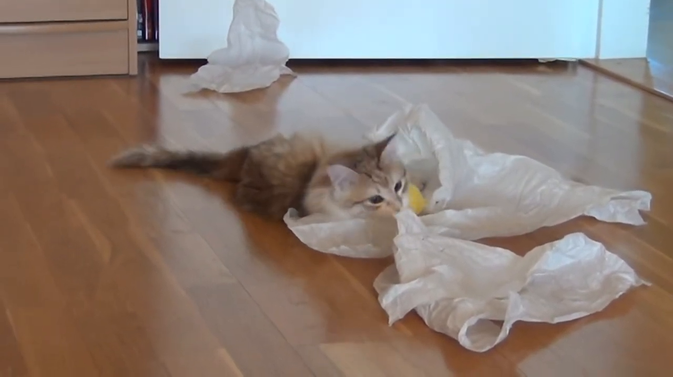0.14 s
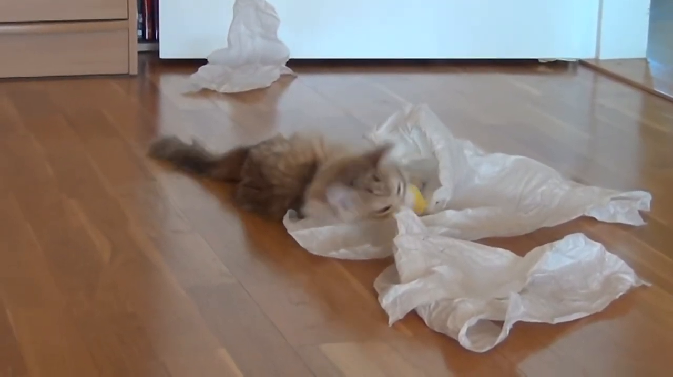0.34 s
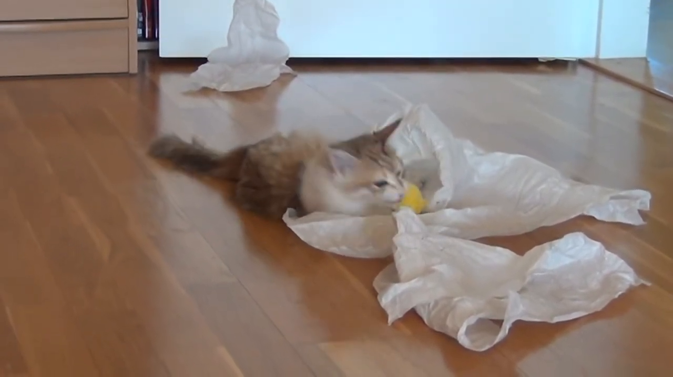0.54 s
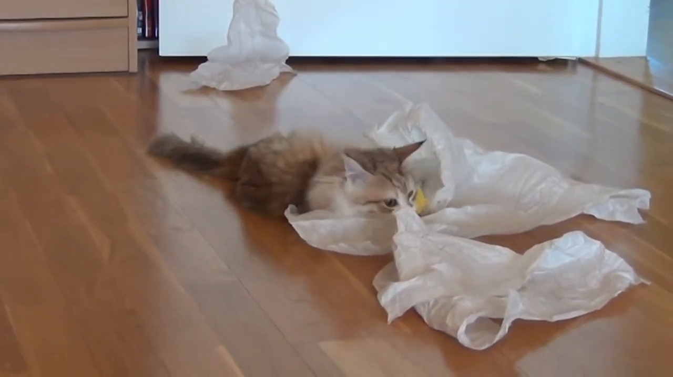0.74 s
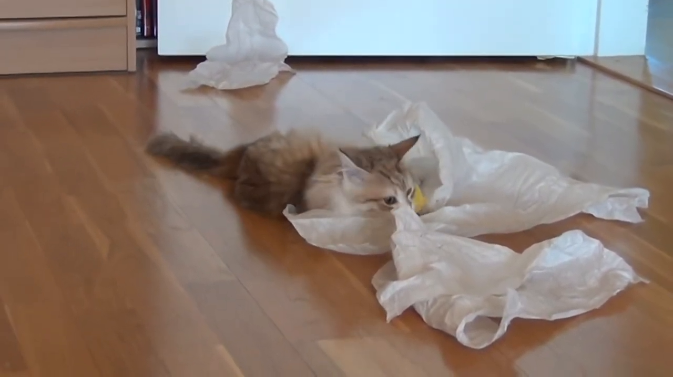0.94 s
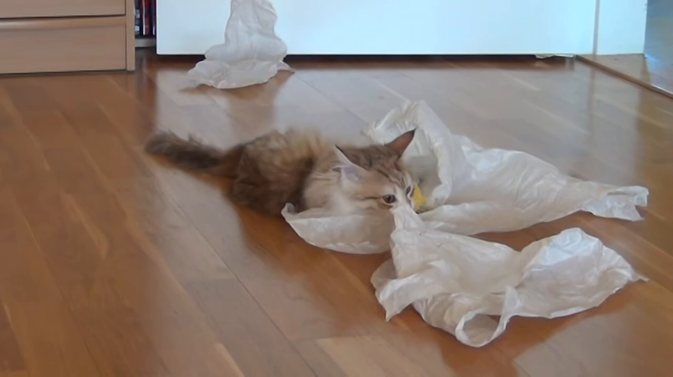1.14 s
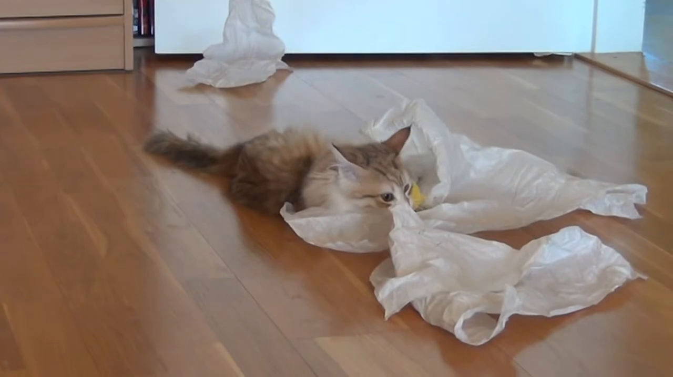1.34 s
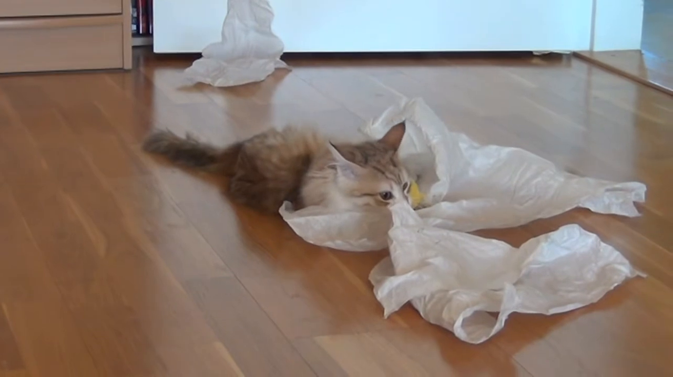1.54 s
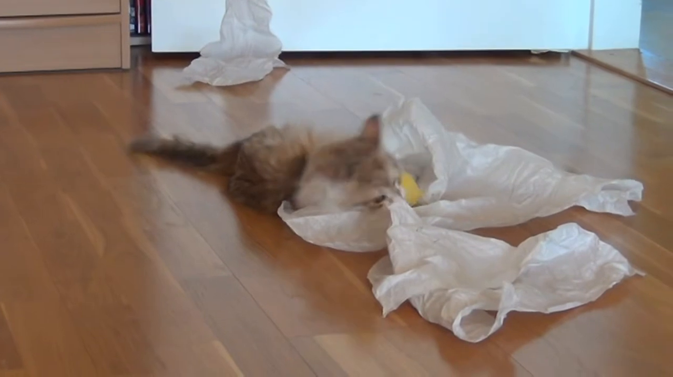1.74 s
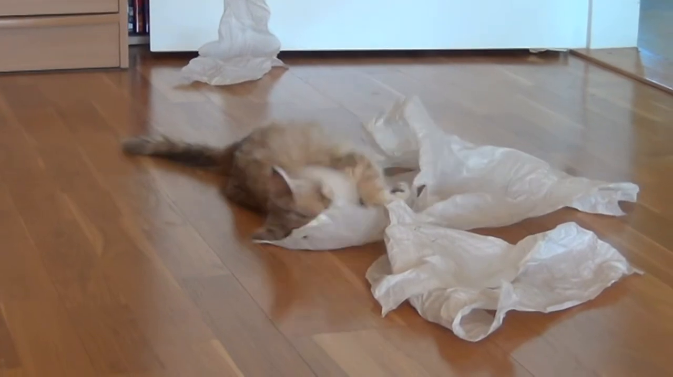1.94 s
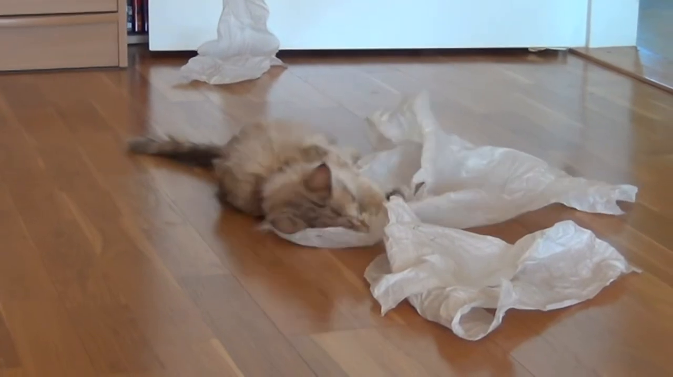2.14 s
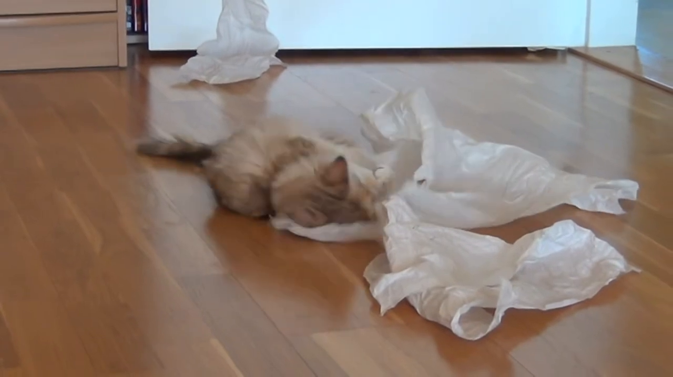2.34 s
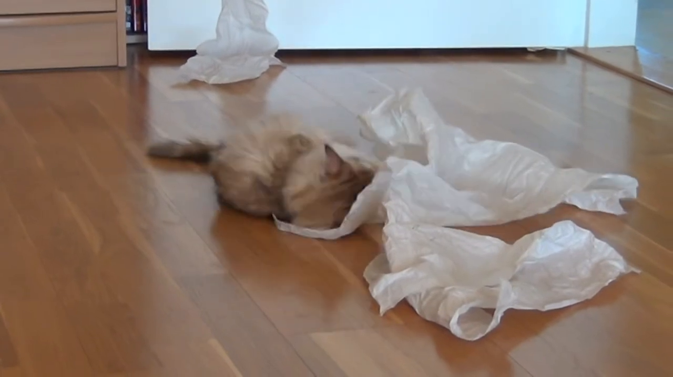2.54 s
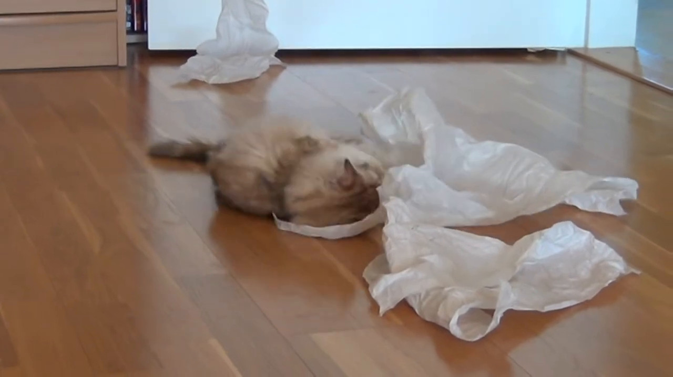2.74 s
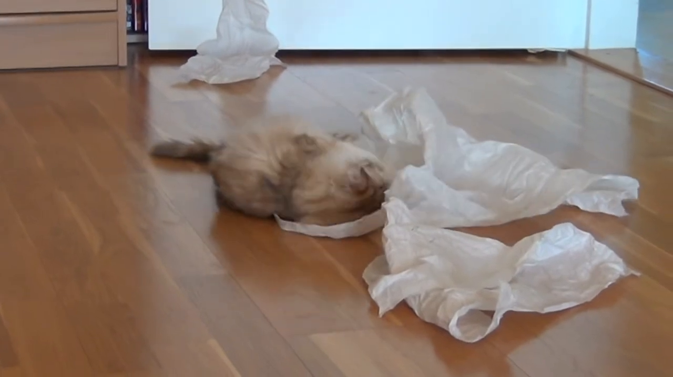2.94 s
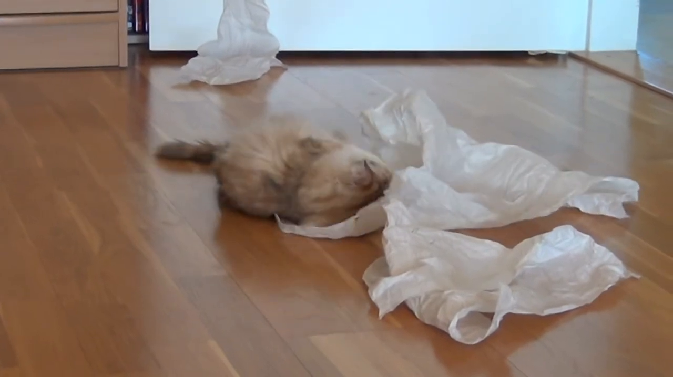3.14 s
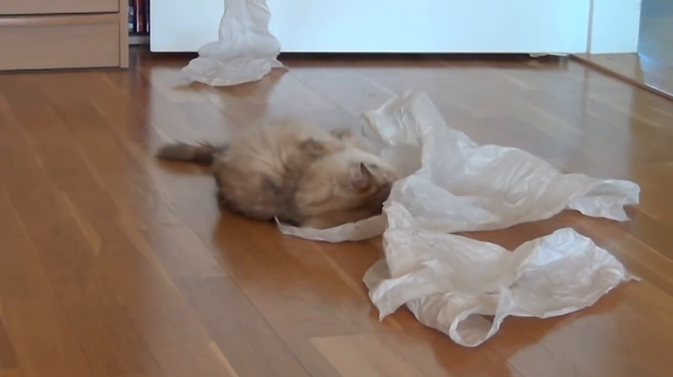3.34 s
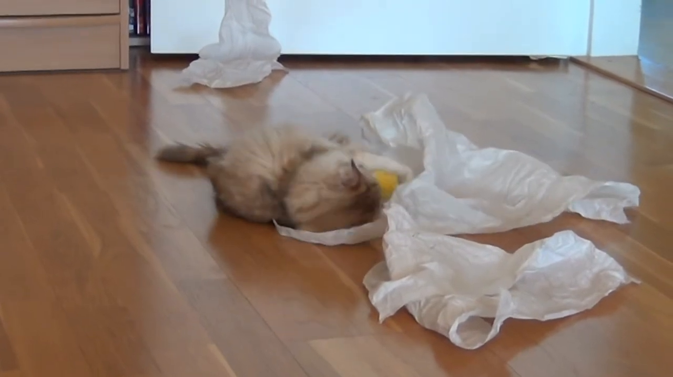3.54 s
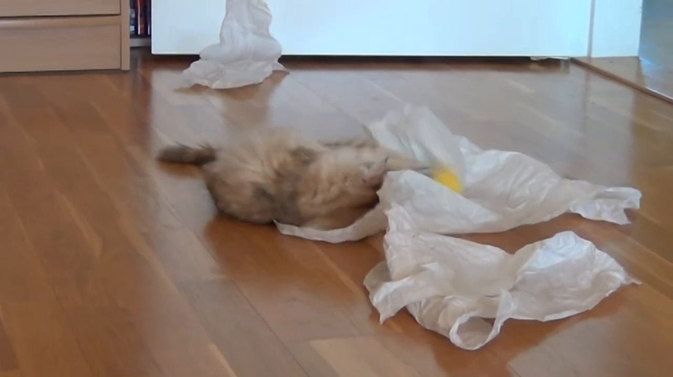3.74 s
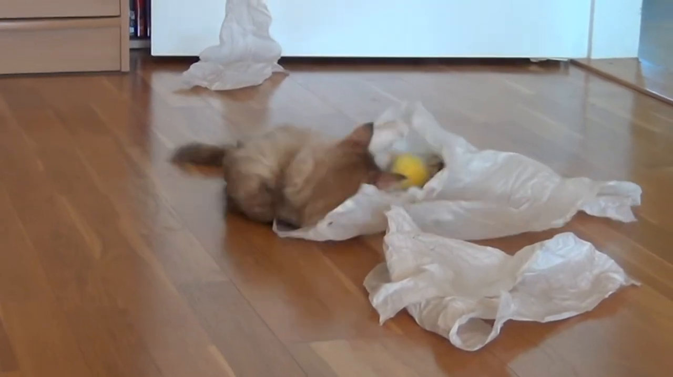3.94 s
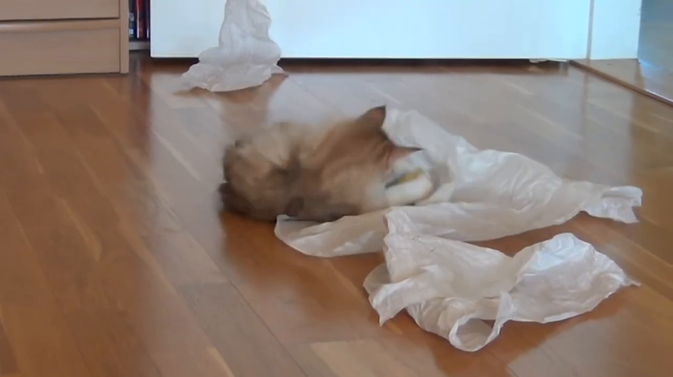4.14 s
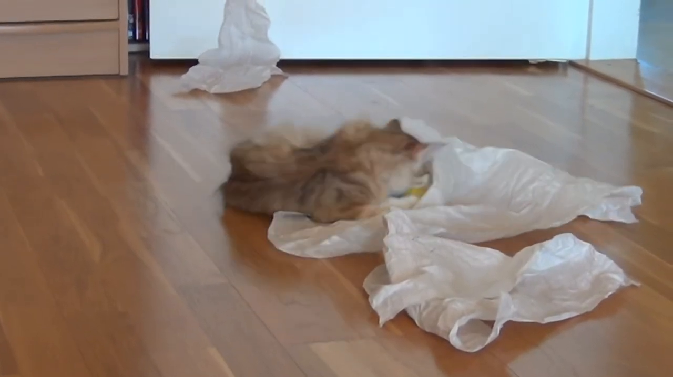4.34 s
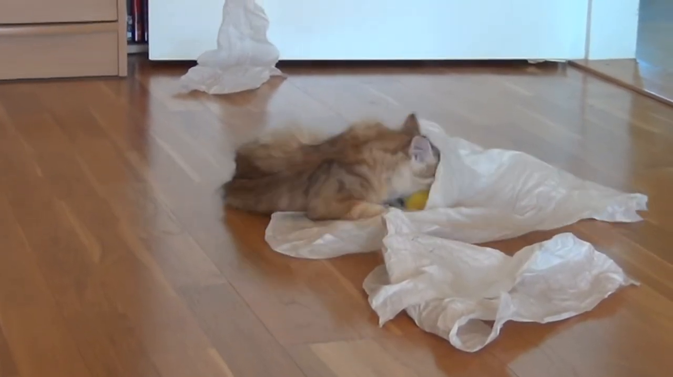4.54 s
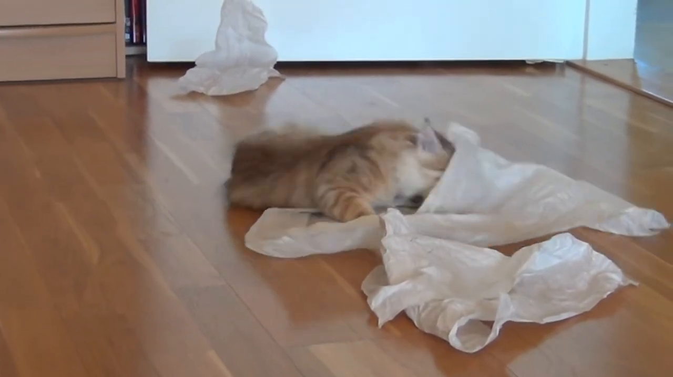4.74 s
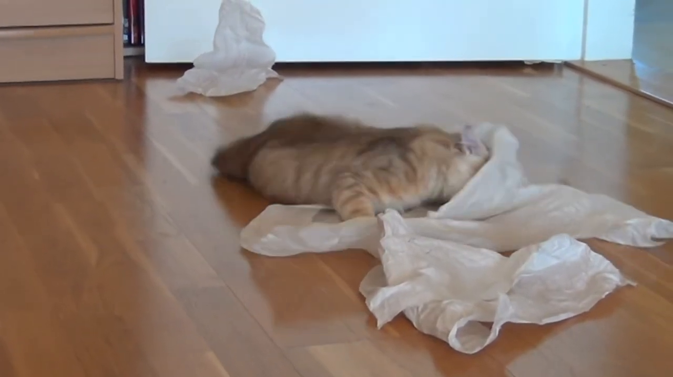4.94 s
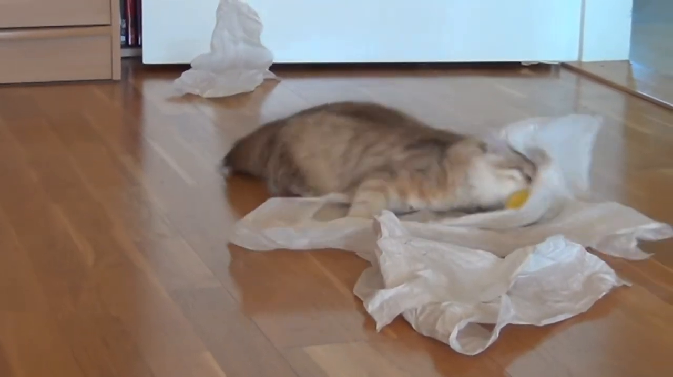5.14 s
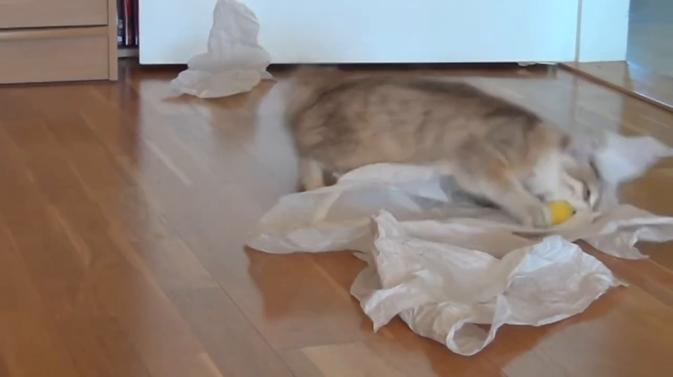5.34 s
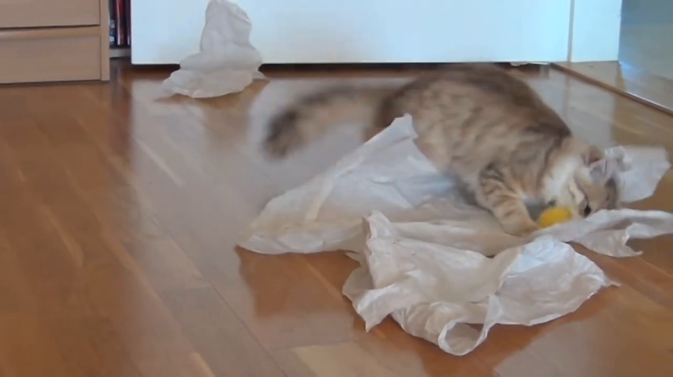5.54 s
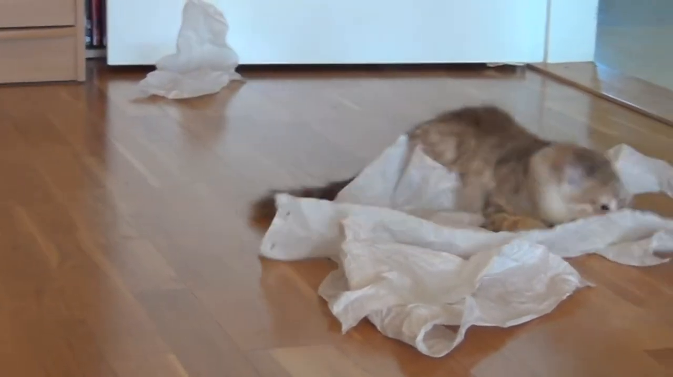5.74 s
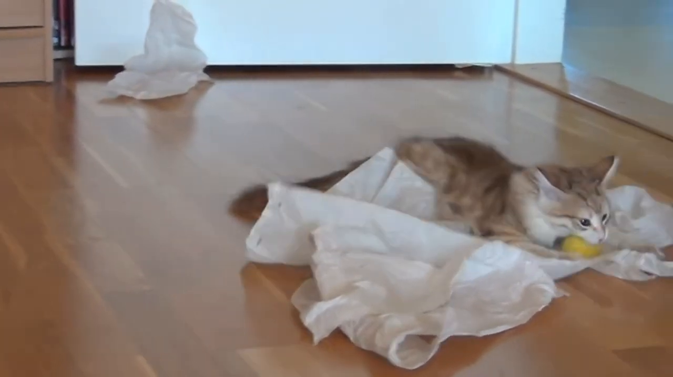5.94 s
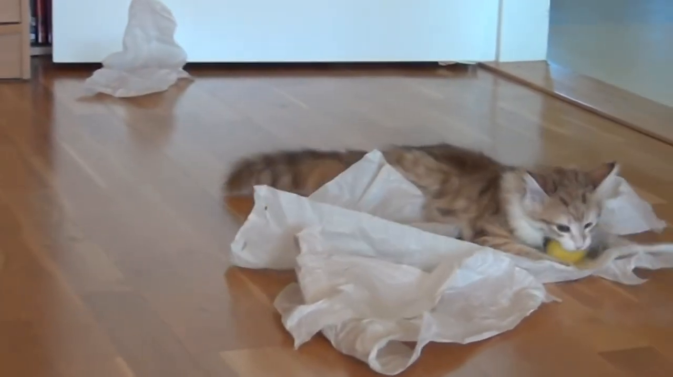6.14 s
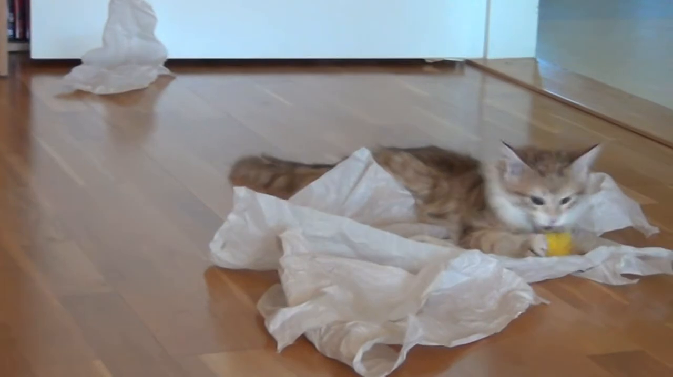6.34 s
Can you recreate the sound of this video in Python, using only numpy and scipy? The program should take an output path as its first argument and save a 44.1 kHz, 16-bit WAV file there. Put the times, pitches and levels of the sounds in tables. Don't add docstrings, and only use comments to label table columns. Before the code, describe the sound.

A kitten plays with thin tissue paper on a wooden floor. Faint crackles and small ticks come first, then a lull, then a sudden loud burst of crinkling as it rolls over. The rustle eases, then returns stronger in jerky pounces with sharp snaps, papery flaps and a few soft low thuds. The bare room rings briefly; a camera microphone nearby adds faint hiss.

```python
import sys
import numpy as np
from scipy import signal
from scipy.fft import rfft, irfft, next_fast_len
from scipy.io import wavfile
from scipy.ndimage import map_coordinates

SR = 44100
rng = np.random.default_rng(int(sys.argv[2]) if len(sys.argv) > 2 else 0)


def materialize(psi):
    bounded = np.clip(np.atleast_2d(psi).T, -1, 1)
    quanta = np.round(bounded * 32767).astype(np.int16)
    wavfile.write(sys.argv[1], SR, quanta)


def linear_from_db(decibels):
    return 10 ** (np.asarray(decibels, float) / 20)


N = 281358


def unit(x):
    return x / np.sqrt(np.mean(x ** 2) + 1e-20)


def along(points, hz):
    point_hz, value = np.transpose(points)
    return np.interp(np.log(hz + 1), np.log(point_hz + 1), value)


def wobble(rate):
    knots = rng.standard_normal(int(N * rate / SR) + 4)
    return map_coordinates(knots, [np.arange(N) * rate / SR])


def filtered(x, response):
    size = next_fast_len(N + SR // 2)
    hz = np.fft.rfftfreq(size, 1 / SR)
    return irfft(rfft(x, size) * response(hz), size)[..., :N]


def above(hz, edge_hz, order=2):
    return (1j * hz / (edge_hz + 1j * hz)) ** order


def below(hz, edge_hz, order=2):
    return (edge_hz / (edge_hz + 1j * hz)) ** order


def paired(pair, alike):
    def turn(hz):
        return np.arccos(np.clip(along(alike, hz), -1, 1)) / 2

    mid, side = filtered(pair, lambda hz: np.array([np.cos(turn(hz)), np.sin(turn(hz))]))
    return np.array([mid + side, mid - side])


# pitch in Hz, level in dB.
PAPER_COLOUR = [(35, -62), (60, -25), (180, -14), (300, -6.5), (502, -8.5), (664, 1.5), (879, -1.5),
                (2510, -2), (2760, -2.5), (3100, -2), (5690, -6), (11200, -4), (15900, -11)]


def through_paper(x):
    log_level = along(PAPER_COLOUR, np.fft.rfftfreq(4096, 1 / SR)) * np.log(10) / 20
    cepstrum = irfft(log_level)
    cepstrum[1:2048] *= 2
    cepstrum[2049:] = 0
    ringing = irfft(np.exp(rfft(cepstrum)))
    return signal.fftconvolve(x, ringing[None], axes=1)[:, :N]


def crackle(low_hz, high_hz, rate, ring_ms, scatter_db, clump_db, blur, spread_db):
    ring = ring_ms * SR / 1000
    draws = rng.random((int(rate * N / SR), 4))
    at = (draws[:, 0] * N).astype(int)
    t = np.arange(round(6 * ring) + 8)
    size_db = scatter_db * np.minimum(-np.log(1 - draws[:, 1]), 4)
    size = linear_from_db(size_db + clump_db * wobble(70)[at])

    drift = linear_from_db(1.6 * wobble(14)[at, None])
    hz = low_hz + (high_hz - low_hz) * draws[:, 2:3] ** drift
    turn = 2 * np.pi * (hz * t / SR + draws[:, 3:])
    rings = size[:, None] * np.exp(-t / ring) * np.sin(turn)
    clicks = np.bincount((at[:, None] + t).ravel(), rings.ravel(), N + len(t))[:N]

    noise = rng.standard_normal(N)
    slide = filtered(noise, lambda f: above(f, low_hz + 1, order=3) * below(f, high_hz, order=3))
    pan = linear_from_db(spread_db * wobble(90) * [[1], [-1]])
    return unit(through_paper((unit(clicks) + blur * unit(slide)) * pan))


# peak in seconds, level in dB, rise in seconds per 10 dB, fall in seconds per 10 dB, crispness in dB.
# A rise below 0.005 s, even a negative one, counts as 0.005 s.
CHEWING = [
    (0, -51, .05, 0.2, -3.5),
    (.25, -60, -0.5, .08, -4),
    (.4, -64, -2, 0.6, -4),
    (.605, -53, 0.09, 0.14, 0),
    (.7, -67, 0.5, 0.6, -3),
    (.88, -59.5, .06, 0.22, -1),
    (1.036, -52, .006, 0.08, -8),
    (1.14, -59, -0.2, 0.14, -3),
    (1.3, -61, -0.05, 0.14, -12),
]
ROLLING = [(1.908, -53.5, 0.017, 0.18, 2), (2.0, -47.5, 0.023, .11, -1), (2.04, -34.5, 0.027, 0.16, 1),
           (2.1, -34.5, 0.051, .12, 2.5), (2.236, -33.5, 0.016, 0.12, 1), (2.31, -37, 0.092, .11, 3.5),
           (2.435, -39.5, 0.093, 0.034, 1), (2.515, -35.5, 0.0087, 0.15, 2.5), (2.6, -33, 0.087, 0.064, 1),
           (2.72, -39.5, 0.13, .4, -1.5), (2.82, -40.5, 0.013, 0.034, -1), (2.95, -42, 0.19, 0.13, -2.5),
           (3.242, -44.5, 0.34, 0.042, 0.5), (3.339, -46.5, 0.055, 0.11, -4.5),
           (3.435, -43.5, 0.026, 0.15, -1), (3.7, -41.5, 0.15, 0.26, -2.5), (3.79, -41, .006, 0.035, 1),
           (3.83, -40, 0.047, 0.13, 0)]
POUNCING = [(3.92, -42, 0.038, 0.13, 4.5), (3.958, -29, 0.018, 0.076, 1.5), (4.05, -35.5, 0.12, 0.54, -1),
            (4.275, -28.5, 0.048, 0.052, 2), (4.4, -33, 0.048, 0.089, 2), (4.45, -37, 0.067, 0.059, 3.5),
            (4.59, -43, 0.13, 0.09, -3.5), (4.67, -35, 0.042, 0.12, -1), (4.78, -44.5, 0.13, 0.062, 6.5),
            (4.917, -32, .11, 0.26, 0.5), (5.066, -31, 0.1, 0.14, 3.5), (5.25, -40, 0.12, .11, -1),
            (5.33, -35, 0.12, 0.052, 7), (5.436, -31.5, 0.21, 0.11, 2), (5.61, -33.5, 0.26, 0.075, 1.5),
            (5.7, -39, 0.046, .15, 5.5), (5.766, -27, .005, 0.075, 4.5), (5.835, -28.5, 0.073, 0.052, 0),
            (5.95, -34, 0.095, 0.27, 1.5), (6.07, -25, 0.033, 0.027, 5), (6.115, -34, 0.023, 0.11, 1),
            (6.2, -42, 0.059, 0.029, 7), (6.3, -39, .04, 0.075, 2), (6.38, -29.5, 0.027, .11, 0)]


def rustle():
    moves = np.vstack([CHEWING, ROLLING, POUNCING])
    peak_s, db, rise_s, fall_s, crisp_db = moves.T[..., None]
    t = np.arange(0, N + 64, 64) / SR
    rising = (peak_s - t) / np.maximum(rise_s, 0.005)
    falling = (t - peak_s) / np.maximum(fall_s, 0.005)
    power = linear_from_db(db - 10 * np.where(t < peak_s, rising, falling)) ** 2

    def total_db(powers):
        rest = linear_from_db(-72.5) ** 2
        return np.interp(np.arange(N) / SR, t, 10 * np.log10(powers.sum(0) + rest))

    effort_db = total_db(power)
    fine_db = total_db(power * linear_from_db(crisp_db) ** 2)
    jerk_db = 0.46 * wobble(35)

    folds = crackle(580, 5500, 4200, 0.44, scatter_db=3.9, clump_db=1.7, blur=0.7, spread_db=1.1)
    fine = crackle(5200, 14200, 4200, 0.2, scatter_db=3.7, clump_db=2.1, blur=0.8, spread_db=1.8)
    flap = crackle(64, 452, 450, 1.5, scatter_db=4, clump_db=3.0, blur=0.63, spread_db=1.5)

    broad = filtered(folds, lambda f: 1 / (1 + (f / 1500) ** 4))
    broad_db = -0.7 - 0.54 * (fine_db - effort_db)
    folds = folds + (linear_from_db(broad_db) - 1) * broad
    flap_db = -55 + 0.73 * (effort_db + 38)
    layers = linear_from_db(effort_db - 0.12) * folds + linear_from_db(fine_db - 1.5) * fine + linear_from_db(flap_db) * flap
    return linear_from_db(jerk_db) * layers


# start in seconds, bright
# tick in dB, dull patch in dB, pitch of the patch in Hz.
CREASE_SNAPS = [(0.0384, -42, -41, 2030), (0.0504, -46, -57, 1170), (0.0802, -32, -47, 860),
                (0.2404, -36, -42.5, 1250), (0.2464, -48, -51, 1070), (0.2927, -44, -50, 830),
                (0.4244, -53, -50, 935), (0.4988, -27.5, -42.5, 1950), (0.5442, -36, -50, 880),
                (0.5591, -38, -52, 840), (0.5721, -28, -42, 3230), (0.5804, -31, -56, 3140),
                (0.5929, -22, -57, 1540), (0.6004, -38, -59, 2950), (0.6134, -39, -48, 4230),
                (0.6234, -41, -45, 915), (0.6843, -37.5, -56, 880), (0.7267, -40, -58, 1050),
                (0.7841, -36, -54, 790), (0.8609, -40, -52, 1720), (0.8754, -41, -57, 920),
                (0.8824, -43, -52, 939), (0.9467, -43, -53, 703), (1.0335, -34, -42, 3730),
                (1.0515, -32.5, -39, 3080), (1.0634, -44, -59, 3050), (1.1368, -35, -52, 748),
                (1.2844, -49, -48, 1430), (1.7729, -43.5, -62, 907), (1.9046, -38, -54, 1720),
                (1.9614, -40, -47.5, 1660), (1.9909, -27, -44, 800), (2.0154, -26, -38, 710),
              (2.0258, -32.5, -32, 1000), (2.0258, -16.5, -39, 3650), (2.0403, -8, -28, 1870),
              (2.0614, -11, -27, 2170), (2.0664, -14, -30, 1840), (2.0874, -15, -29, 2580),
              (2.0974, -26, -25, 1830), (2.2164, -22, -28, 2100), (2.2554, -21, -26, 1960),
              (2.3104, -18, -43, 2650), (2.4693, -21, -31, 1360), (2.4764, -22, -45, 1790),
              (2.5112, -30, -35, 1410), (2.5454, -21, -21.5, 4040), (2.812, -19, -26.5, 1610),
              (2.9154, -34, -39, 716), (2.9684, -28, -28, 854), (2.9926, -21, -41, 783),
              (3.0275, -29, -29, 2860), (3.3484, -34, -34.5, 2040), (3.4224, -39, -36, 720),
              (3.5274, -26, -45, 3500), (3.6097, -27, -39, 2550), (3.7824, -36, -34, 902),
              (3.7883, -15.5, -36, 703), (3.8184, -21, -31, 2710), (3.8866, -31, -41, 750),
                (3.9125, -33, -35, 2030), (3.9244, -25, -42, 2160), (3.9528, -20, -31, 1640),
                (4.1008, -18.5, -33, 2970), (4.2584, -28, -25, 2160), (4.3764, -34, -34, 3640),
                (4.5714, -32.5, -37, 2880), (4.6004, -43, -37, 2270), (4.6424, -31, -38, 4300),
                (4.7012, -19, -44, 2150), (4.7327, -20, -35, 3020), (4.7984, -36, -51, 915),
                (4.9685, -25, -41, 3080), (5.0066, -14, -25, 2270), (5.0484, -9.5, -35, 947),
                (5.1264, -17, -31, 1070), (5.2624, -28, -32, 4340), (5.2922, -9, -30, 1200),
                (5.33, -21, -20, 2490), (5.5797, -9, -23, 2010), (5.6927, -17, -35, 2720),
                (5.7024, -15.5, -29, 3240), (5.7631, -15, -30, 1510), (5.7777, -5, -29, 2090),
                (5.7944, -17, -21, 950), (6.021, -12, -29, 3370), (6.0624, -6, -18, 1600),
                (6.0844, -15, -19, 2020), (6.2094, -17, -33, 1890), (6.2711, -22, -37, 3370)]


def snaps():
    ring_s, lag_s = 0.00076, 0.0008
    t = np.arange(SR // 25) / SR
    fade = np.exp(-t / ring_s)
    bright, dull = np.zeros((2, 2, N + SR))
    for s, tick_db, patch_db, hz in np.array(CREASE_SNAPS):
        shake = rng.standard_normal((2, len(t)))
        pan = linear_from_db(rng.normal(0, 1.0) * np.array([[1], [-1]]))
        jolt = 3 * (t == 0)
        tick = (shake[0] + jolt) * (fade + 0.23 * fade ** 0.046)
        tick = tick / np.linalg.norm(tick[:SR // 500])

        band = signal.butter(2, [hz / 2.17, hz * 1.64], "band", fs=SR, output="sos")
        flutter = unit(signal.sosfilt(band, shake[1]))
        tone = 1.2 * np.sin(2 * np.pi * hz * t) * fade ** 0.11
        patch = tone + flutter * (fade ** 0.51 + 0.49 * fade ** 0.02)
        patch = patch / np.abs(patch).max()

        tick_gain = linear_from_db(tick_db + 20.5 - 0.15 * (tick_db + 28.5))
        patch_gain = linear_from_db(patch_db + 5.5 - 0.19 * max(patch_db + 47, 0))
        at = round((s + lag_s) * SR)
        bright[:, at:at + len(t)] += pan * tick_gain * tick
        dull[:, at:at + len(t)] += pan * patch_gain * patch
    bright = filtered(bright[:, :N], lambda f: above(f, 4100, order=3) * below(f, 14000))
    return through_paper(bright) + filtered(dull[:, :N], lambda f: above(f, 700))


# start in seconds, peak level in dB, pitch of the boards in Hz.
PAW_THUDS = [
    (2.106, -28, 283),
    (2.428, -44.5, 225),
    (5.766, -40, 229),
    (5.85, -37.5, 306),
    (6.07, -46, 252),
]


def paws():
    out = np.zeros(N + SR)
    t = np.arange(SR // 4) / SR
    boards = signal.butter(2, [190, 460], "band", fs=SR)
    swell = 1 - np.exp(-t / 0.011)
    for s, db, hz in PAW_THUDS:
        push = np.exp(-((t - 0.007) / 0.0062) ** 2) * np.sin(2 * np.pi * hz * t)
        shaking = unit(signal.lfilter(*boards, rng.standard_normal(len(t))))
        rumble = linear_from_db(-9.0 - 60 * t / 0.33) * swell * shaking
        out[round(s * SR):][:len(t)] += linear_from_db(db - 1.0) * (push + rumble)
    return out[:N]


# pitch in Hz, time in seconds to die away by 60 dB.
ROOM_RING = [(150, 0.48), (1500, 0.48), (5000, 0.54), (14000, 0.045)]
# pitch in Hz, likeness (1 is the same in both).
ECHO_LIKENESS = [(100, 0.96), (600, 1), (2500, 0.31), (5500, 0.021), (10000, 0.14), (15000, 0.46)]


def room(x, count=44):
    hz, t, z = signal.stft(rng.standard_normal((count, 2, SR // 3)), SR, nperseg=256)
    dying = linear_from_db(-60 * t / along(ROOM_RING, hz)[:, None])
    tails = signal.istft(z * dying, SR, nperseg=256)[1]
    hop = N // (count - 1) + 1
    padded = np.pad(x, (hop + 130, 3 * hop))
    wet = np.zeros((2, N + SR + 4 * hop))
    for k, tail in enumerate(tails):
        part = padded[k * hop:][:2 * hop] * np.hanning(2 * hop) ** 0.5
        echo = signal.fftconvolve(part[None], tail / np.linalg.norm(tail), axes=1)
        wet[:, k * hop:k * hop + echo.shape[1]] += echo
    return paired(wet[:, hop:hop + N], ECHO_LIKENESS)


# pitch in Hz, level in dB.
HUSH_COLOUR = [(20, -40), (35, -12), (55, -11), (127, -2.5), (250, -1.5), (420, -5.5), (800, -0.5),
               (1100, -7), (2000, -11), (3700, -16.5), (11000, -21), (14600, -19), (15500, -17),
               (16000, -12)]
# pitch in Hz, likeness (1 is the same in both).
HUSH_LIKENESS = [(25, .9), (100, 1), (240, 0.9), (950, 0.54), (3800, 0.19), (15000, 0.87)]


def hush():
    noise = rng.standard_normal((2, N))
    pair = filtered(noise, lambda hz: linear_from_db(along(HUSH_COLOUR, hz)))
    return linear_from_db(-55.5 + 0.14 * wobble(5.9)) * unit(paired(pair, HUSH_LIKENESS))


def scene():
    near = rustle() + snaps() + paws()
    echoes = linear_from_db(-6.5) * room(near.mean(0))
    to_right = linear_from_db([[-0.35], [0.35]])
    return (near + echoes) * to_right + hush()


def band_limit(x):
    return signal.sosfilt(signal.butter(12, 17070, fs=SR, output="sos"), x)


# its pitch in Hz, width in Hz, height in dB.
MIC_PEAK = (10900, 1350, 2)


def record(dry):
    peak_hz, width_hz, db = MIC_PEAK

    def microphone(f):
        damping = 1j * f * width_hz
        resonance = damping / (peak_hz * peak_hz - f * f + damping)
        return (1 + (linear_from_db(db) - 1) * resonance) * (f < 15950)

    mix = filtered(dry, microphone)
    return band_limit(mix)


dry = scene()
out = record(dry)
materialize(out)
```